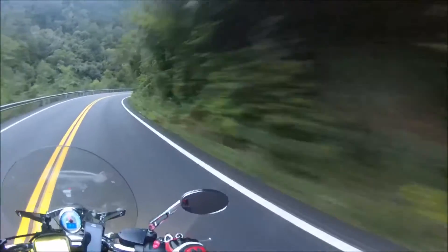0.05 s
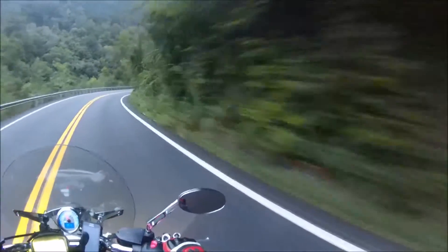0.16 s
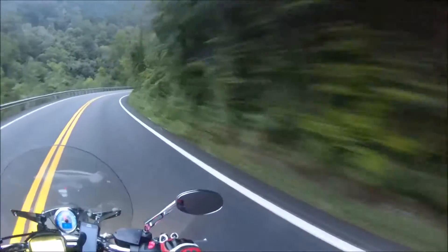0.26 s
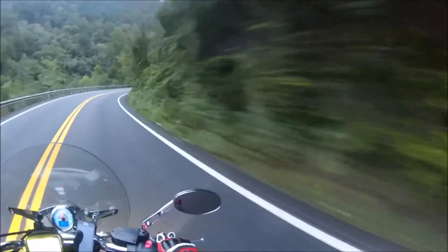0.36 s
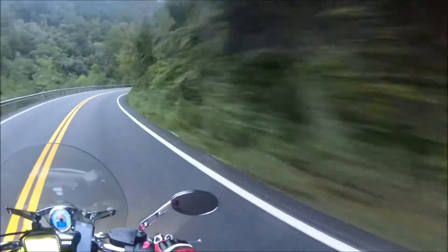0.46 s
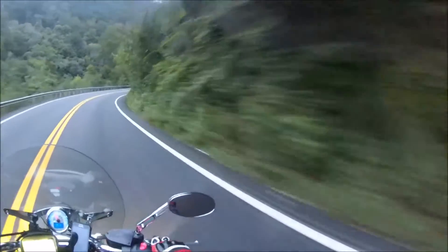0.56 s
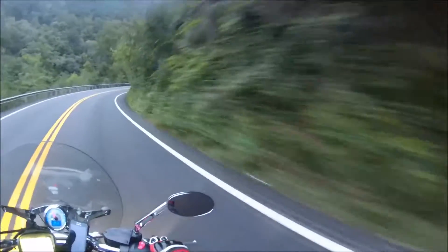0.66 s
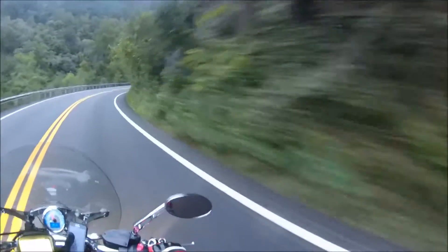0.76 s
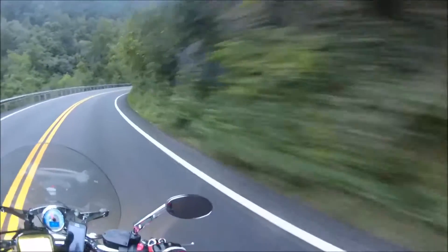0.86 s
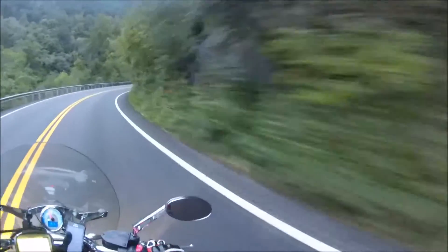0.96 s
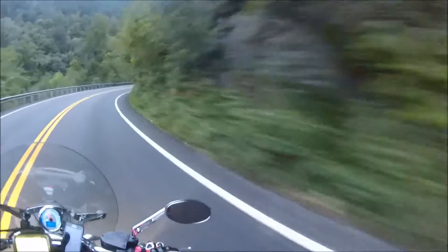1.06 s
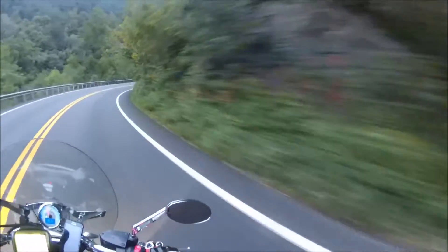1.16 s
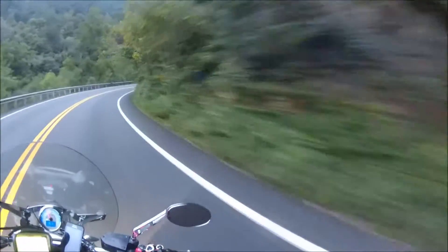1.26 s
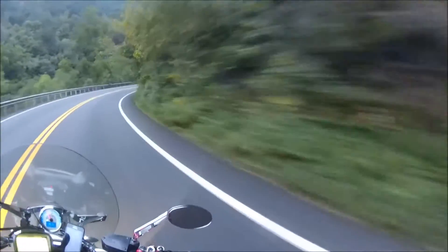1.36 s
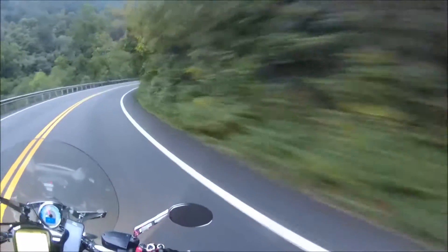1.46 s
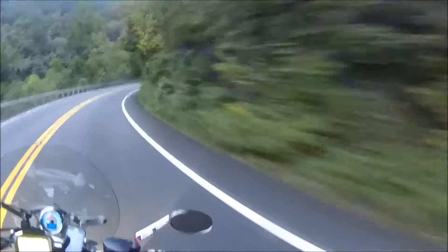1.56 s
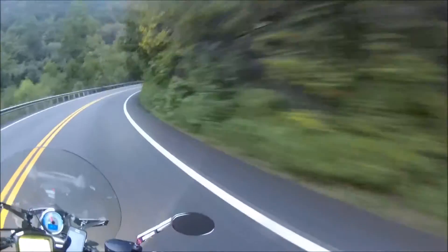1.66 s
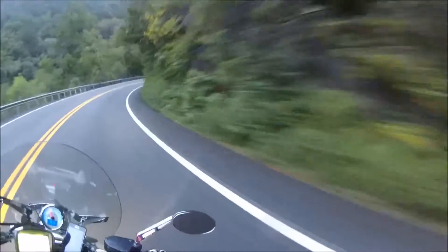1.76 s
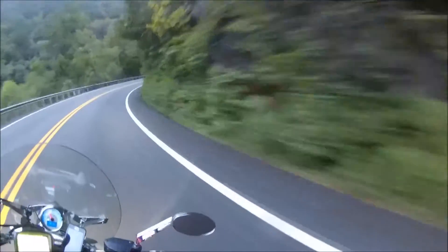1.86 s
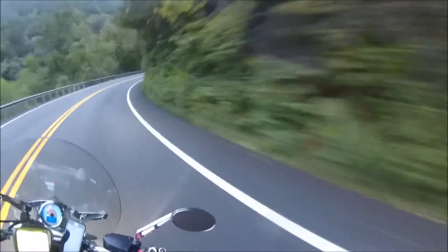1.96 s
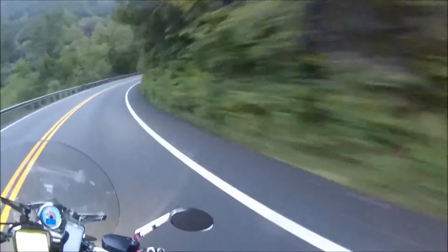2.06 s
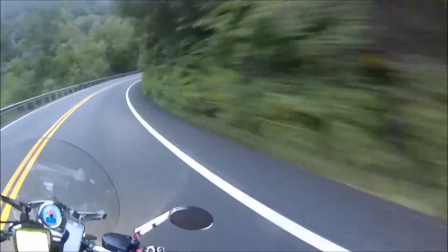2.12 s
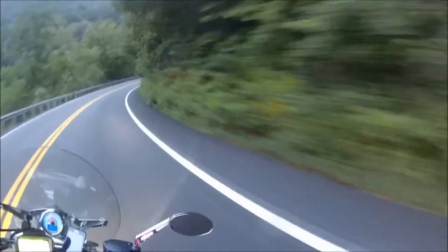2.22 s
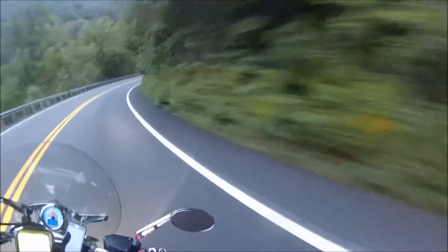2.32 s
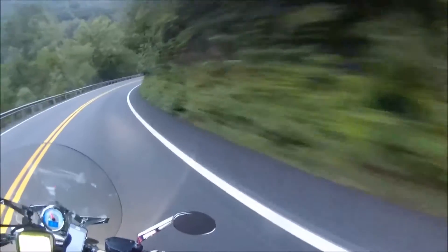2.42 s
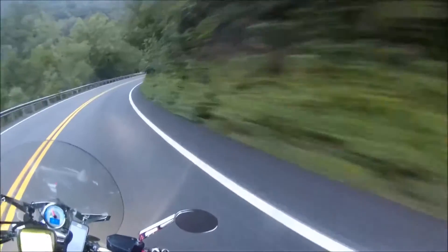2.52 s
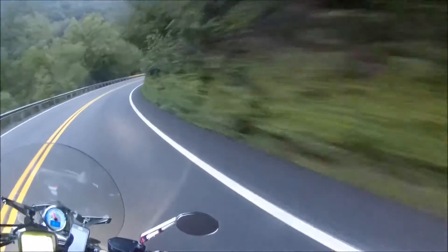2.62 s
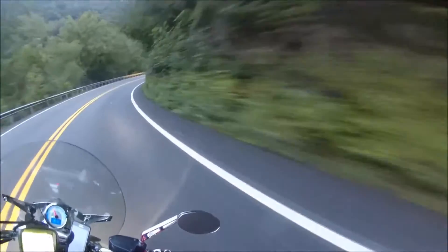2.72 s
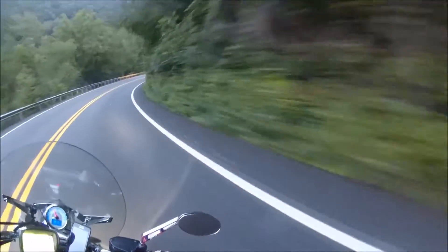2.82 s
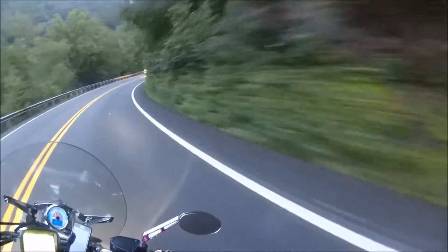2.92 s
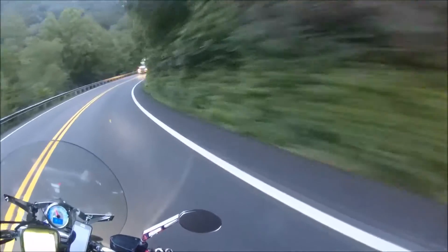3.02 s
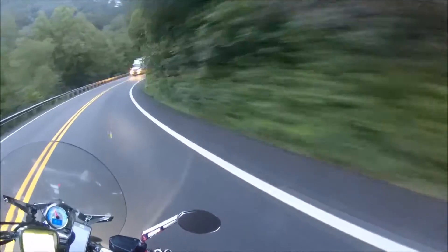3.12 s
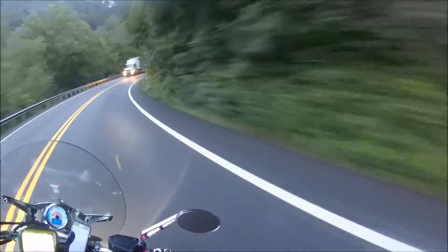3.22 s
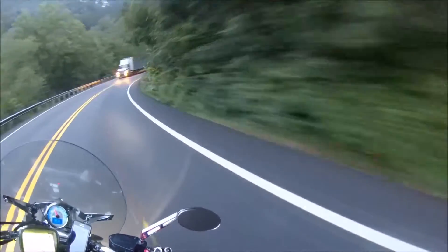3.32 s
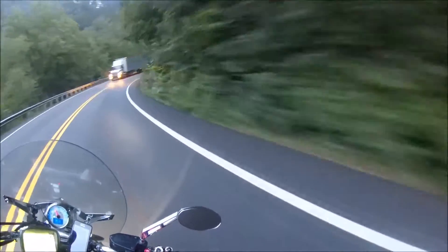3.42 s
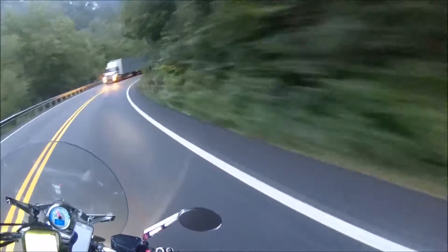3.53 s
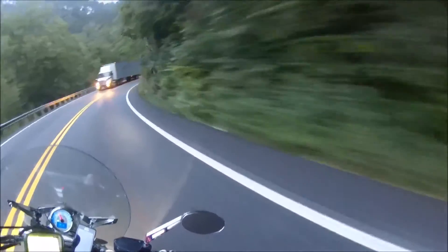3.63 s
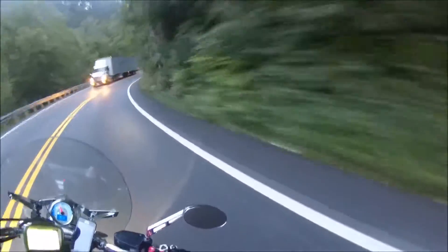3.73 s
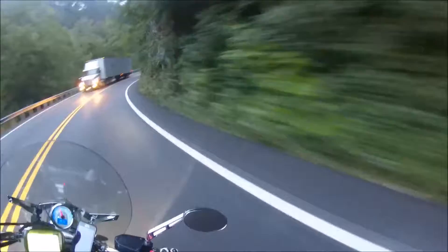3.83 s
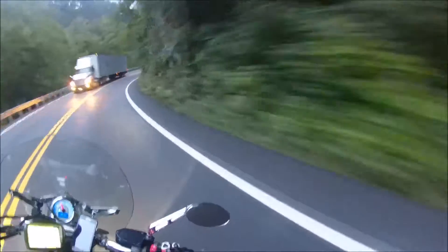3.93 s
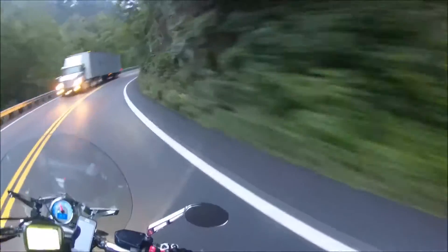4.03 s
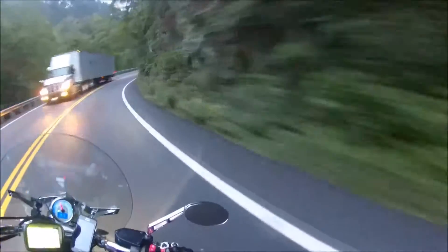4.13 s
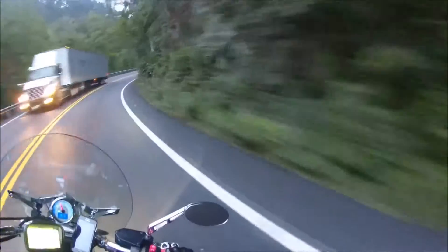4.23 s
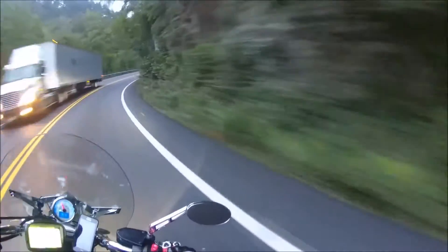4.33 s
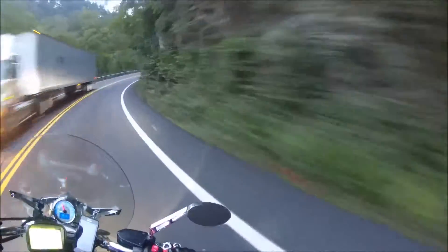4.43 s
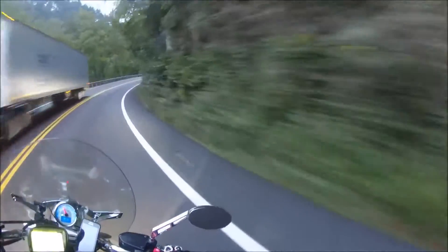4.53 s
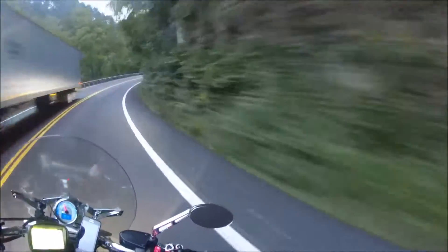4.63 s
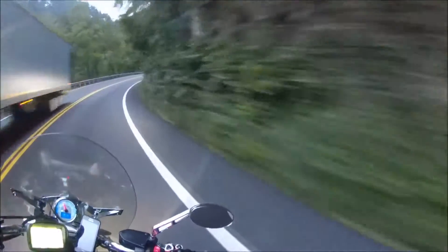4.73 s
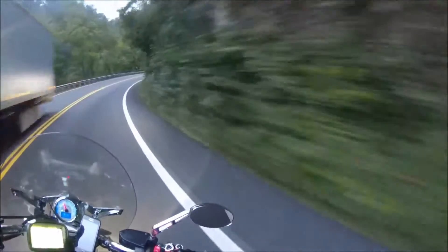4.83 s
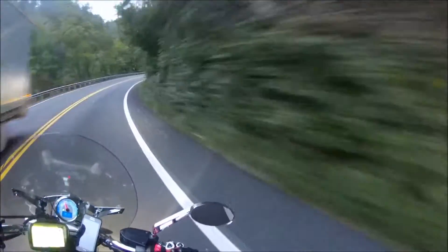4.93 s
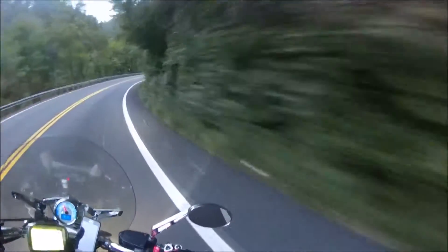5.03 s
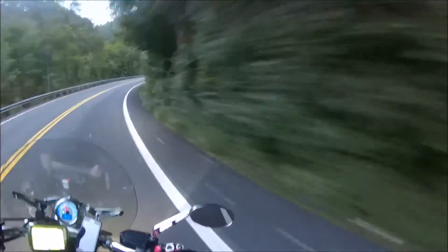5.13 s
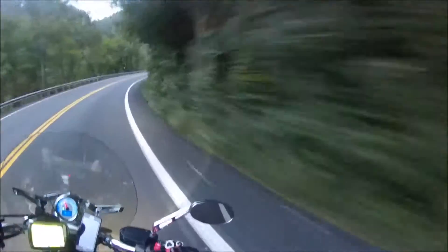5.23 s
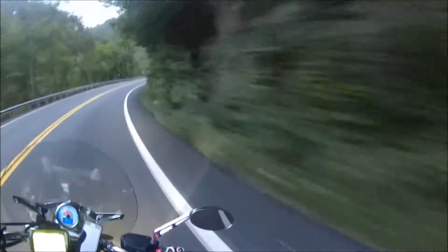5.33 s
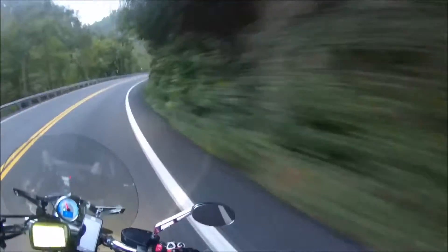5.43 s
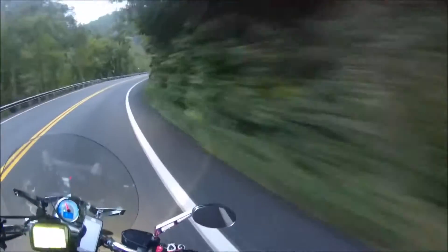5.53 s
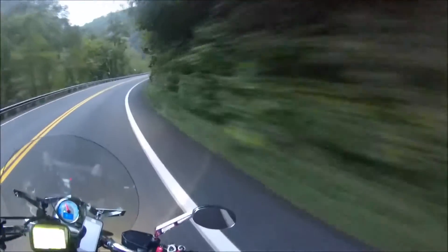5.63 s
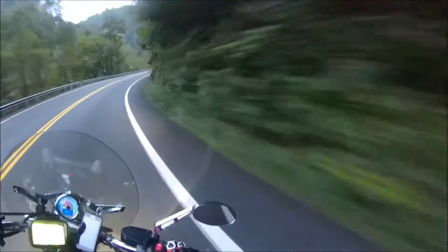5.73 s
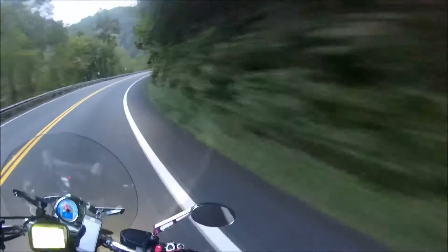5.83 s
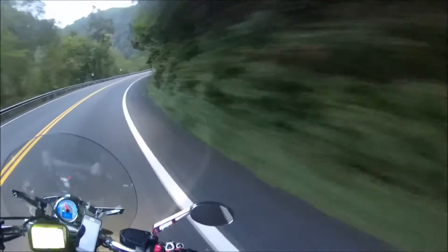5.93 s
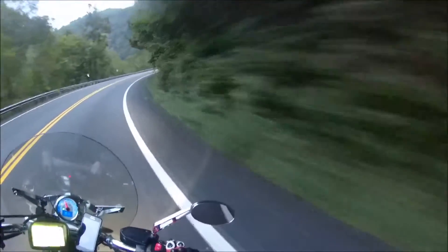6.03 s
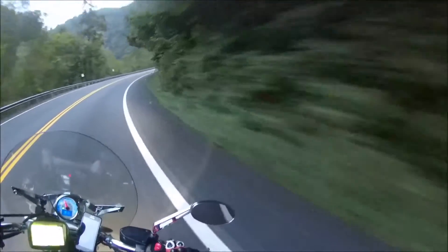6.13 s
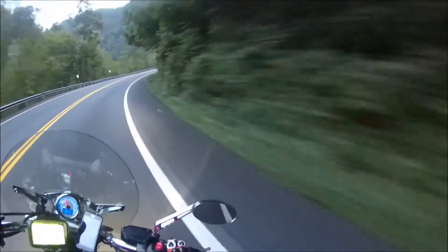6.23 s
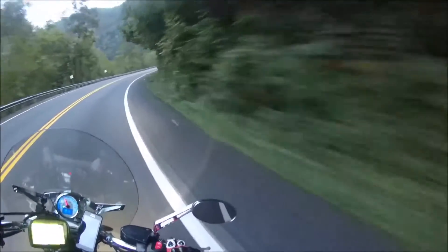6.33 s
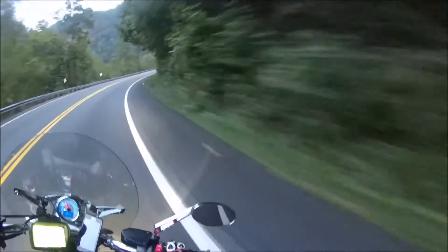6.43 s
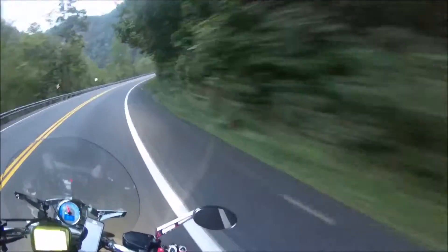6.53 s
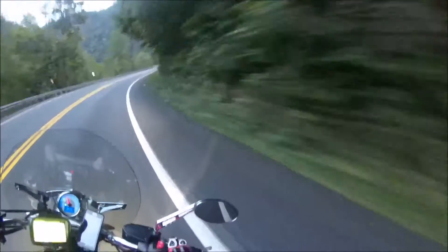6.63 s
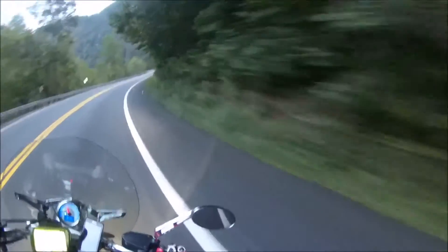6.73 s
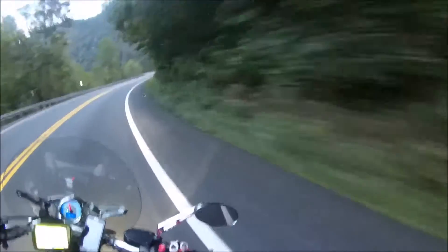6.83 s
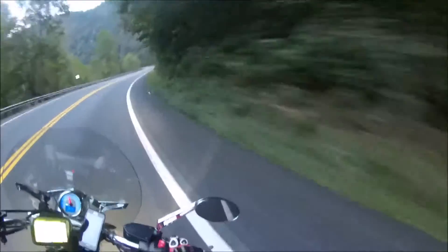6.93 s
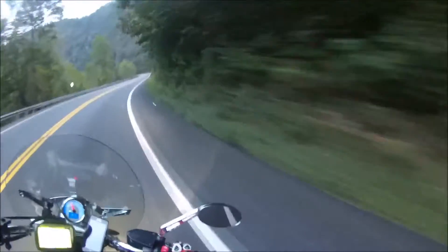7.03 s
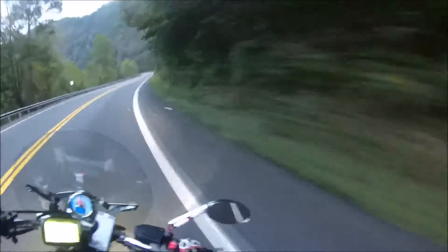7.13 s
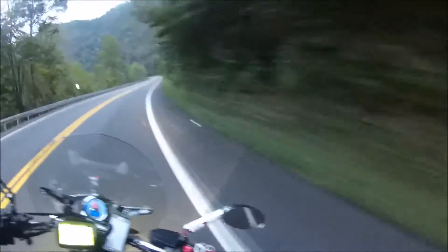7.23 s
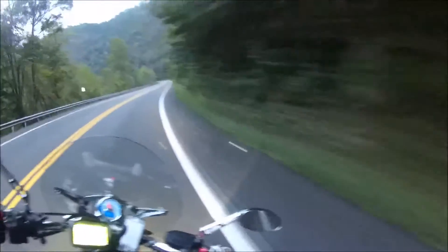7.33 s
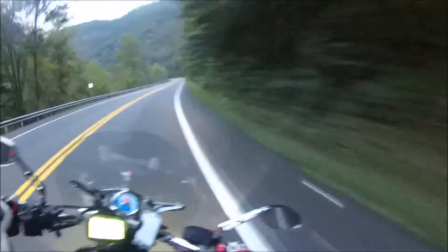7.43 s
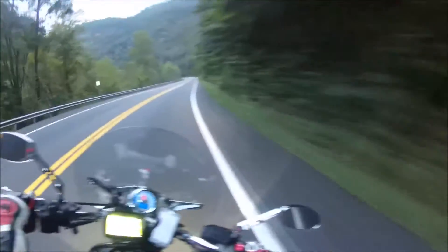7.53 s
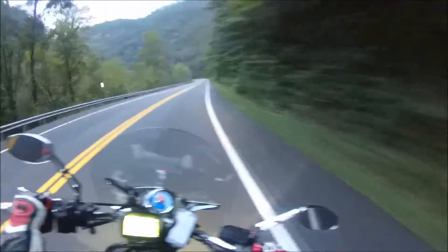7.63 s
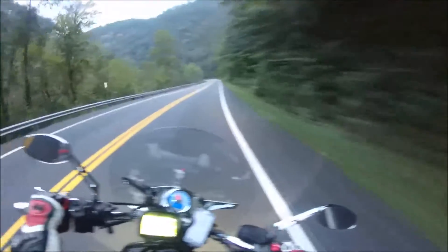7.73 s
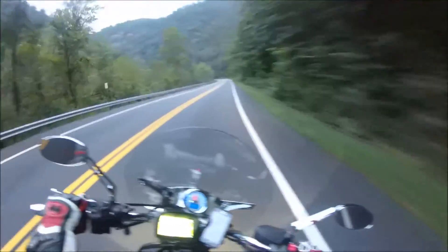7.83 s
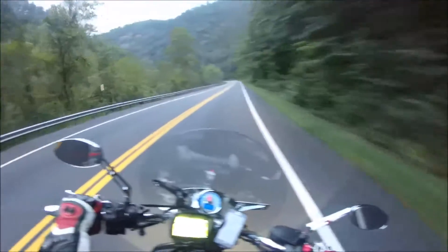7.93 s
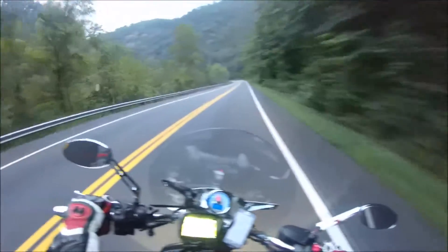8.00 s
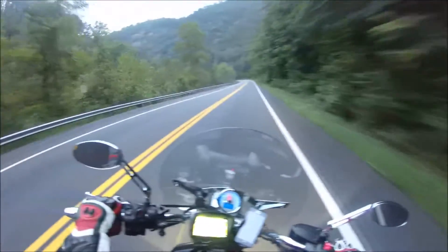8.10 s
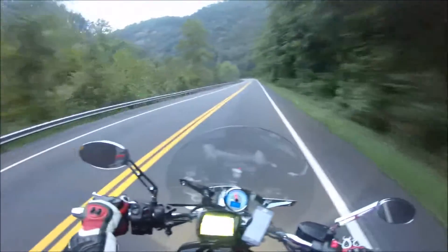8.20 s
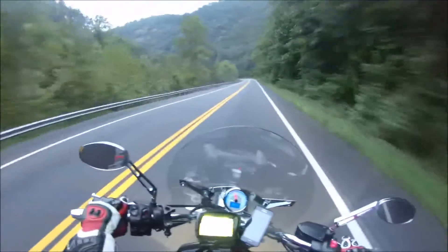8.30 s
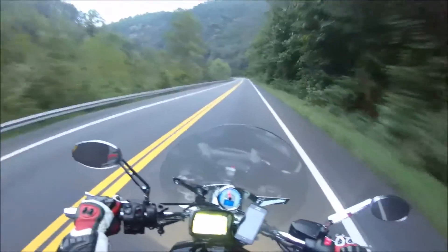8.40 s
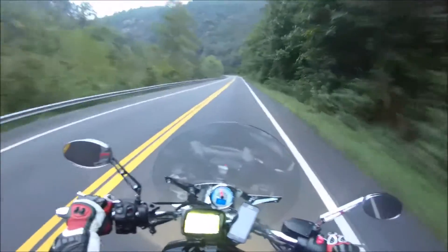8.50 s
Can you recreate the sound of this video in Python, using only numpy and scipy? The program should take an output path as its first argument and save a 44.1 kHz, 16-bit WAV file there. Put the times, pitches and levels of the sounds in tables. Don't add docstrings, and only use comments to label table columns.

```python
import sys
import numpy as np
from scipy import signal
from scipy.io import wavfile
from scipy.ndimage import uniform_filter1d

SR = 44100
rng = np.random.default_rng(int(sys.argv[2]) if len(sys.argv) > 2 else 0)


def gain_from_db(level_db):
    decades = np.asarray(level_db, float) / 20
    return 10 ** decades


def put_to_file(sound):
    columns = np.atleast_2d(sound).T
    safe = np.clip(columns, -1, 1)
    whole_steps = np.round(safe * 32767)
    wavfile.write(sys.argv[1], SR, whole_steps.astype(np.int16))


N = 377496
T = np.arange(N) / SR

# time in seconds, engine cycles per second.
SPEED = [(0.0, 17.339), (1.05, 16.659), (1.25, 16.658), (1.35, 16.61), (1.45, 17.216), (1.57, 16.641),
         (1.9, 16.807), (2.7, 17.106), (3.2, 17.399), (3.7, 17.528), (4.6, 17.253), (5.5, 17.487),
         (6.4, 17.938), (7.1, 18.384), (7.7, 18.697), (8.56, 19.111)]
# time in seconds, opening from 0 (shut) to 3 (wide).
THROTTLE = [
    (0, 0),
    (1.12, 0),
    (1.3, .8),
    (1.7, 1),
    (4.3, 1),
    (5.3, 1.8),
    (5.9, 2),
    (6.4, 2.45),
    (6.95, 3),
    (8.56, 3),
]
FIRING = [
    .11,
    .53,
]
ORDERS_HEARD = np.arange(3, 33)


def evened(x):
    return x / np.sqrt(np.mean(abs(x) ** 2) + 1e-20)


def curve(rows, index, t=T):
    rows = np.array(rows)
    return np.interp(t, rows[:, 0], rows[:, index])


def by_throttle(levels):
    return np.interp(curve(THROTTLE, index=1), np.arange(4), levels)


def resonate(x, hz, width):
    turn = np.exp(2j * np.pi * np.cumsum(hz * np.ones(N)) / SR)
    r = np.exp(-np.pi * width / SR)
    return 2 * (turn * signal.lfilter([1 - r], [1, -r], x / turn)).real


def ring(x, modes):
    return evened(sum(gain_from_db(db) * resonate(x, hz, width) for hz, width, db in modes))


def clicks(turns, places, spread_db, jitter):
    out, count = np.zeros(N), np.arange(1, int(turns[-1]))
    for place in places:
        late, size = rng.standard_normal((len(count), 2)).T
        at = np.interp(count + place + jitter * late, turns, np.arange(N))
        out[at.astype(int)] += gain_from_db(spread_db * size)
    return out


def noise(spectrum, patchy_db, flicker_db):
    frames, hz = N // 128 + 5, np.fft.rfftfreq(512, 1 / SR)
    a, b, patches = rng.standard_normal((frames, 257, 3)).T
    patches = uniform_filter1d(patches, size=5, axis=0)
    patches = evened(uniform_filter1d(patches, size=24, axis=1))
    flicker = evened(uniform_filter1d(rng.standard_normal(frames), size=12))
    f, db = np.transpose(spectrum)
    shape_db = np.interp(np.log(hz + 1), np.log(f), db, left=-70)[:, None]
    z = (a + 1j * b) * gain_from_db(shape_db + patchy_db * patches + flicker_db * flicker)
    return evened(signal.istft(z, nperseg=512, noverlap=384)[1][:N])


def cased(x, edge_hz):
    return signal.sosfilt(signal.butter(3, edge_hz, fs=SR, output="sos"), x)


def note_levels():
    # multiple of the cycle rate,
    # then level in dB with the throttle shut, light, medium and wide.
    pipe = np.array([(3, -62, -84.5, -84.6, -54), (4.77, -53, -53.5, -54.5, -54),
                     (7, -58.5, -41.4, -45.5, -42.5), (10.56, -53.5, -46.5, -52.5, -49.5),
                     (15.56, -67, -66, -50.5, -50.4), (18.94, -57.5, -44.5, -41, -37.5),
                     (24.75, -56.5, -43, -40.5, -45.5), (29.73, -65.1, -65.5, -52, -47)])
    echo_steps = [
        [(0.374, 0.692), (0.204, -0.82), (0.321, -0.518), (0.579, 0.818)],
        [(0.416, 0.397), (0.307, -0.245), (0.935, 0.82), (0.393, 0.192)],
        [(0.388, 0.378), (0.408, 0.39), (0.976, 0.699), (0.714, 0.497)],
        [(0.417, 1.0), (0.312, -0.585), (0.736, -0.503), (0.544, 0.242)],
    ]
    k = ORDERS_HEARD
    levels = []
    for db, echoes in zip(pipe.T[1:], echo_steps):
        beat = abs(1 + sum(size * np.exp(-2j * np.pi * k * place) for place, size in echoes))
        colour_db = np.interp(np.log(k), np.log(pipe[:, 0]), db)
        levels.append(colour_db + 20 * np.log10(beat + 1e-3))
    return levels


def causal_lags(levels_db):
    half = np.log(gain_from_db(np.r_[[-70] * 3, levels_db, np.linspace(-50, -60, 32)]))
    return -signal.hilbert(np.r_[half, half[-2:0:-1]]).imag[3:3 + len(levels_db)]


def exhaust(turns):
    # time in seconds, level in dB.
    effort = [(0, -1), (1.1, -1.5), (1.3, -3), (2, -1.5), (2.5, 0), (3.5, 1), (3.9, -1.5), (4.8, -1.5),
              (5.3, -0.5), (6.6, -1.5), (7.2, -0.5), (8.56, -0.5)]
    # pitch in Hz, width in Hz, level in dB.
    pipe_rings = [(437, 18, 4), (375, 25, -3), (320, 18, 2.5), (265, 25, -2)]
    step = np.arange(0, N + 200, 200) / SR
    throttle, out = curve(THROTTLE, index=1, t=step), np.zeros(N)
    states = note_levels()
    lags = np.transpose([causal_lags(state) for state in states])
    for k, levels_db, rings in zip(ORDERS_HEARD, np.transpose(states), lags):
        smear, pumping = rng.standard_normal(2)
        lag = np.interp(throttle, np.arange(4), rings) - 2 * np.pi * k * FIRING[0]
        lag = lag + smear * np.clip(np.maximum(40 / k - 2, 2 - .175 * throttle ** 2), 0, 2)
        lag = lag + 2.5 * pumping * np.clip(1 - throttle, 0, 1)
        a, b = uniform_filter1d(rng.standard_normal((len(step), 2)), size=14, axis=0).T
        waver = 1 + np.clip(.016 * (k - 5), .04, .14) * evened(a + 1j * b)
        hz = k * curve(SPEED, index=1, t=step)
        rings_db = sum(db * np.exp(-((hz - f) / width) ** 2) for f, width, db in pipe_rings)
        level_db = np.interp(throttle, np.arange(4), levels_db)
        level_db = level_db + rings_db * np.clip(throttle - .6, 0, 1)
        size = gain_from_db(level_db) * waver * np.exp(1j * lag)
        size = np.interp(T, step, size.real) + 1j * np.interp(T, step, size.imag)
        out += np.sqrt(2) * (size * np.exp(2j * np.pi * k * turns)).real
    return out * gain_from_db(curve(effort, index=1))


def bark(turns):
    # pitch in Hz, width in Hz, level in dB.
    bark_tones = [(622, 12, 27), (758, 49, 18), (920, 53, 13), (1120, 180, -5), (1330, 230, -15.5),
                  (1960, 420, -58), (3500, 2300, -30)]
    # time in seconds, peak in dB.
    loud_cracks = [(6.1719, -39), (6.5622, -33), (6.5804, -43), (6.6176, -40), (6.621, -37), (6.889, -39.5),
                   (7.671, -36), (7.811, -39.5), (7.97, -34.5), (8.2825, -41), (8.494, -31.5)]
    front = clicks(turns, FIRING[:1], spread_db=2, jitter=.002)
    rear = clicks(turns, FIRING[1:], spread_db=3, jitter=.004)
    fronts = front + 0.38 * rear
    fronts = fronts + 0.5 * np.roll(fronts, round(0.0052 * SR))
    spray = signal.oaconvolve(fronts, np.exp(-T[:600] / .002))[:N] * rng.standard_normal(N)
    blows = ring(evened(fronts) + .45 * evened(spray), bark_tones)
    loud = np.zeros(N)
    for s, db in loud_cracks:
        loud[round(s * SR)] = gain_from_db(db)
    puff = signal.oaconvolve(loud, np.exp(-T[:300] / .0015))[:N] * rng.standard_normal(N)
    level_db = by_throttle([-46, -47.5, -45.5, -37.5])
    return gain_from_db(level_db) * cased(blows, 5600) + 1.6 * cased(resonate(puff, 3000, 4300), 10200)


def valves(turns):
    knock_places = [
        .345,
        .77,
    ]
    # pitch in Hz, width in Hz, level in dB.
    head_tones = [(730, 34, -13), (1380, 58, 8), (1404, 26, 3), (2020, 620, -12.5)]
    first = clicks(turns, knock_places[:1], spread_db=2, jitter=.006)
    second = clicks(turns, knock_places[1:], spread_db=2, jitter=.008)
    knocks = first + 0.72 * second
    knocks = knocks + 0.18 * np.roll(knocks, round(0.001573 * SR))
    level_db = by_throttle([-53.0, -44.0, -41.5, -44])
    return gain_from_db(level_db) * cased(ring(knocks, head_tones), 2550)


def crackle(turns):
    # level in dB, from throttle shut to wide.
    crackle_levels = [
        -70,
        -68,
        -61,
        -50.5,
    ]
    late_s, length_s, echo_s = .0008, .004, .0065
    first = clicks(turns, FIRING[:1], spread_db=1.5, jitter=.003)
    second = clicks(turns, FIRING[1:], spread_db=2, jitter=.006)
    blows = first + .35 * second
    blows = blows + .4 * np.roll(blows, round(echo_s * SR))
    burst = np.sin(np.pi * np.clip((T[:600] - late_s) / length_s, 0, 1))
    spits = rng.standard_normal(N) * gain_from_db(2 * rng.standard_normal(N // 30 + 1).repeat(30)[:N])
    gas = resonate(signal.oaconvolve(blows, burst)[:N] * spits, 2200, 3500)
    return gain_from_db(by_throttle(crackle_levels)) * evened(cased(gas, 4300))


def air(turns):
    # pitch in Hz, level in dB per Hz.
    roar_colour = [(40, -53), (130, -12), (250, -15), (380, -1.5), (560, -8.5), (800, -2), (1080, -7),
                   (1350, -5), (1520, -14), (1750, -16.5), (2500, -22), (3500, -33.5), (5000, -32),
                   (7000, -88)]
    # pitch in Hz, level in dB per Hz.
    hiss_colour = [(2500, -35), (4000, -10.5), (5800, 14), (7000, 10.5), (9000, 4.5), (11000, 1.5),
                   (13000, -4), (15600, -4)]
    # pitch in Hz, level in dB.
    whine_tones = [(9002, -93), (10000, -95), (10999, -92), (12000, -94), (13000, -97), (14000, -98),
                   (15000, -98)]
    speed = curve(SPEED, index=1)
    throb = 1 + .02 * curve(THROTTLE, index=1) ** 2 * np.cos(2 * np.pi * (turns - .4))
    roar_db = -34 + 3 * (speed - 17.5)
    roar = gain_from_db(roar_db) * throb * noise(roar_colour, patchy_db=0.5, flicker_db=1.28)
    hiss_db = -61.5 + 4.5 * np.maximum(speed - 18.1, 0)
    hiss = gain_from_db(hiss_db) * noise(hiss_colour, patchy_db=1, flicker_db=1)
    whine = sum(gain_from_db(db + 2.5) * np.sin(2 * np.pi * hz * T) for hz, db in whine_tones)
    return roar + hiss + whine


def lorry():
    cab_s, tail_s = 4.78, 5.15
    wash = noise([(100, -25), (600, -5), (1000, -4), (1380, 0), (1650, -9), (3000, -24),
                  (6000, -35), (16000, -65)], patchy_db=.5, flicker_db=.3)
    hz = 850 - 40 * np.tanh((T - (cab_s + tail_s) / 2) / .7)
    band = resonate(resonate(wash, hz, 480), hz, 700)
    ahead, past = np.maximum(cab_s - T, 0), np.maximum(T - tail_s, 0)
    level_db = -27.8 - 15 * (ahead + 2 * np.maximum(ahead - .7, 0))
    level_db = level_db - 8 * np.minimum(past / .16, 1) - 25 * past
    return gain_from_db(level_db) * evened(evened(band) + 0.81 * wash)


def thinned(x):
    # pitch in Hz, dB against its usual level.
    survival_bar = [(2800, -25), (3600, -1), (4400, 7), (5700, 5), (6700, 9), (8500, 5), (10500, -2),
                    (12500, -7), (16000, -10)]
    starved_times = [.15, .36, 2.05, 2.22, 2.84, 2.97, 3.075, 3.17, 3.245, 3.84, 4.74, 4.93, 4.98, 6.79,
                     7.22, 7.32, 7.56]
    hz, t, z = signal.stft(x, SR, window="cosine", nperseg=1536, noverlap=768)
    level_db = 20 * np.log10(abs(z) + 1e-9)
    loud_db = 10 * np.log10((abs(z) ** 2).sum(0) + 1e-9)
    f, db = np.transpose(survival_bar)
    bar_db = np.median(level_db, 1) + np.interp(hz, f, db, left=-90)
    bar_db = bar_db[:, None] + .55 * (loud_db - np.median(loud_db))
    band = (np.log(hz + 1) * 12).astype(int)
    wobble_db = 5 * rng.standard_normal((len(t), band.max() + 1)).T[band]
    starved = (abs(t - np.array(starved_times)[:, None]) < .009).any(0)
    starved_db = 25 * starved * (hz > 4300)[:, None]
    keep = level_db > bar_db + wobble_db + starved_db
    return signal.istft(z * keep, SR, window="cosine", nperseg=1536, noverlap=768)[1][:N]


def scene():
    sag = 1.8 * np.exp(-((T - 1.21) / .045) ** 2)
    turns = (np.cumsum(curve(SPEED, index=1) - sag) + sag.sum()) / SR
    engine = exhaust(turns) + bark(turns) + valves(turns) + crackle(turns)
    return -(engine + air(turns) + lorry())[None]


def roll_off(x):
    return signal.sosfilt(signal.butter(12, 15710, fs=SR, output="sos"), x)


def record(dry):
    ceiling = .26
    rounded = np.tanh(dry[0] / ceiling) * ceiling
    return roll_off(thinned(rounded)[None])


dry = scene()
out = record(dry)
put_to_file(out)
```